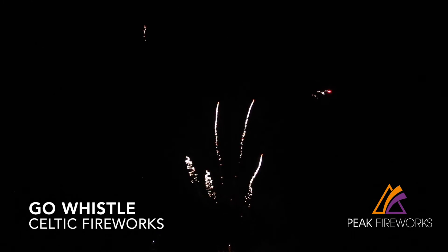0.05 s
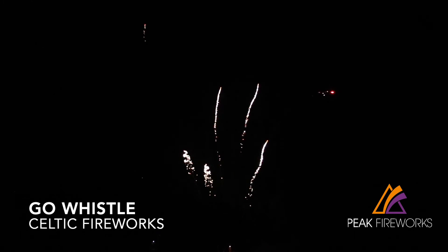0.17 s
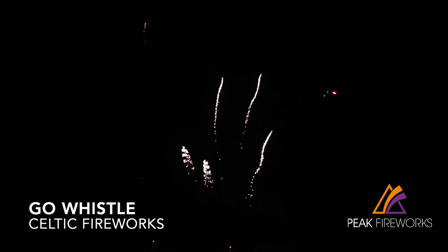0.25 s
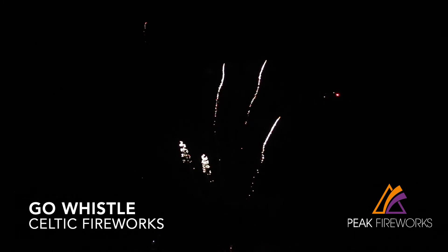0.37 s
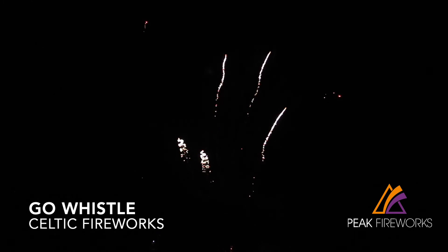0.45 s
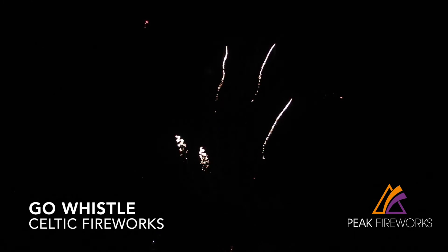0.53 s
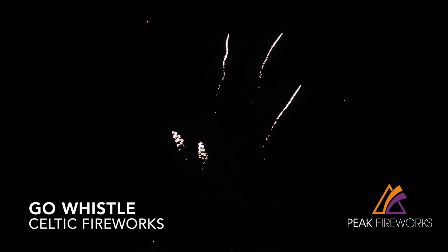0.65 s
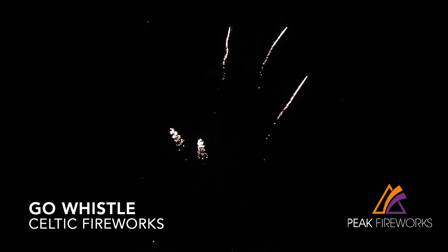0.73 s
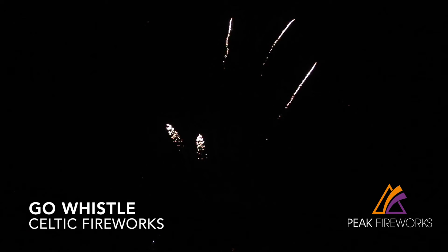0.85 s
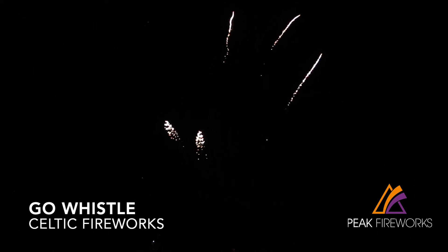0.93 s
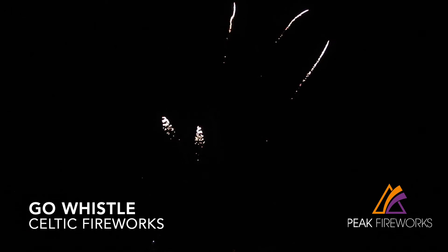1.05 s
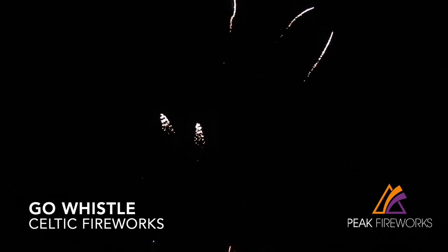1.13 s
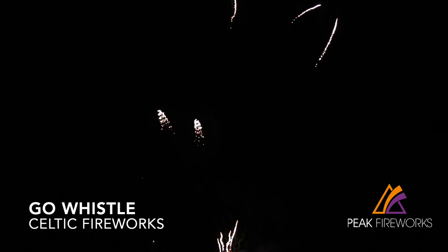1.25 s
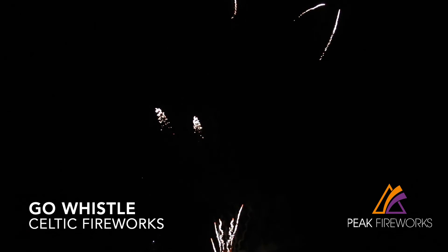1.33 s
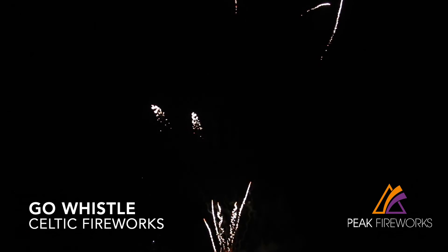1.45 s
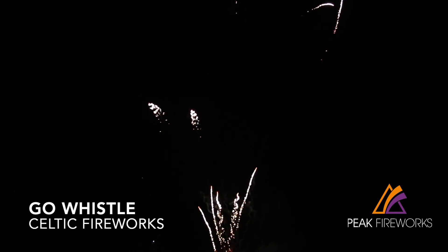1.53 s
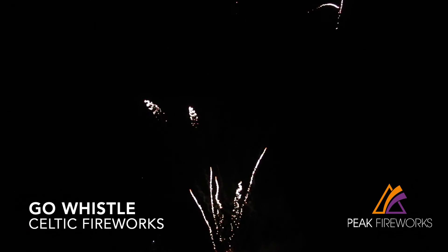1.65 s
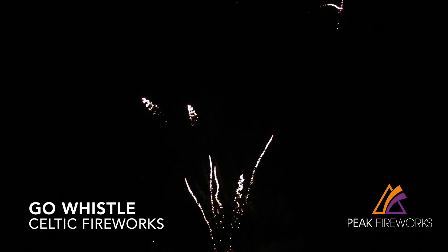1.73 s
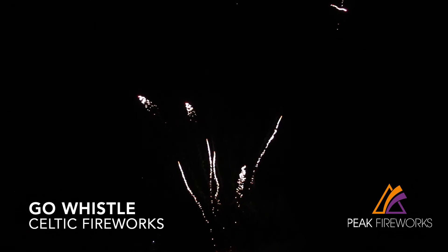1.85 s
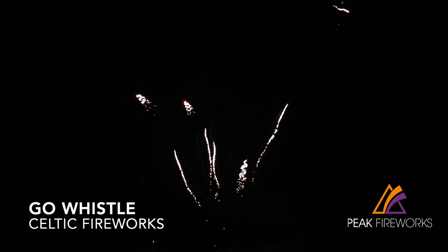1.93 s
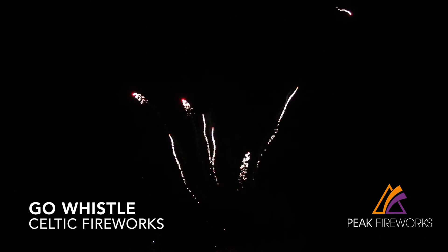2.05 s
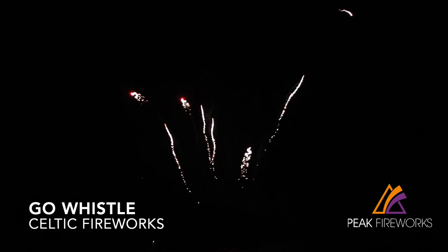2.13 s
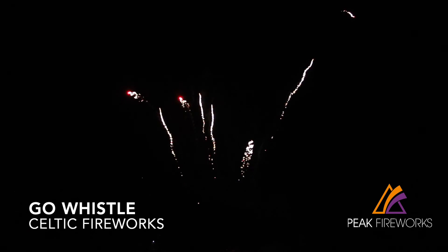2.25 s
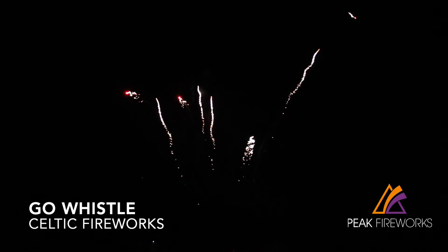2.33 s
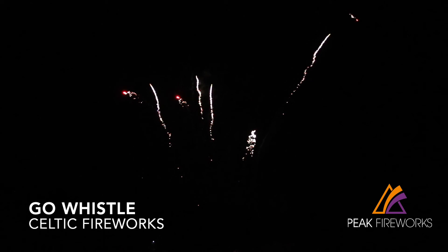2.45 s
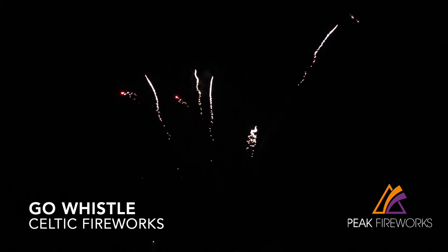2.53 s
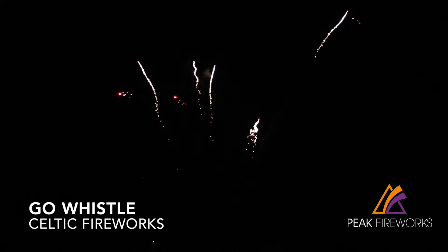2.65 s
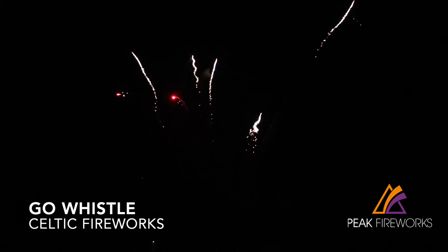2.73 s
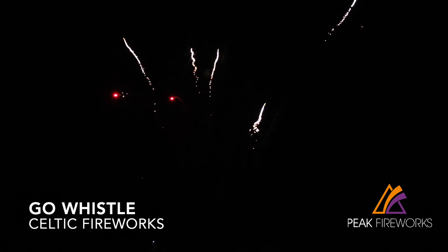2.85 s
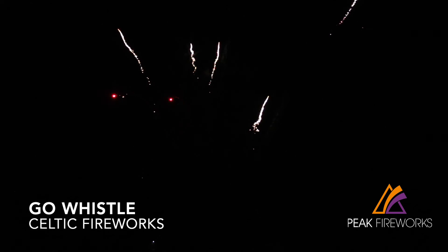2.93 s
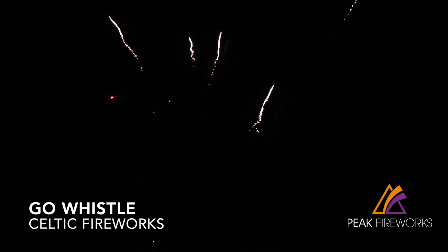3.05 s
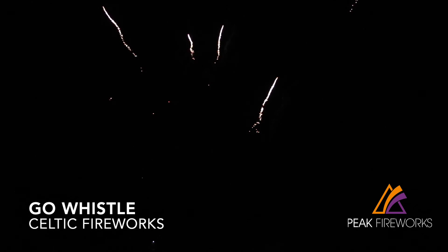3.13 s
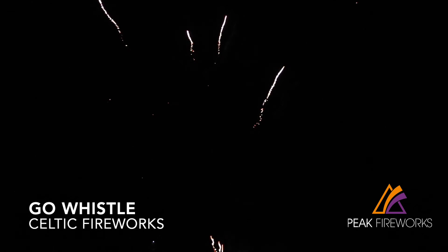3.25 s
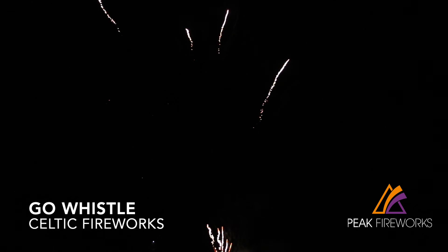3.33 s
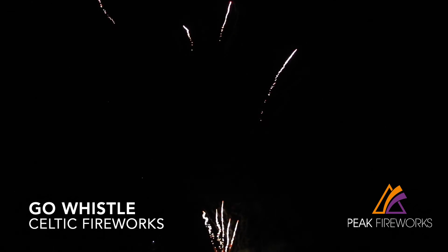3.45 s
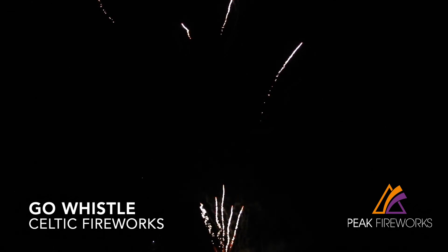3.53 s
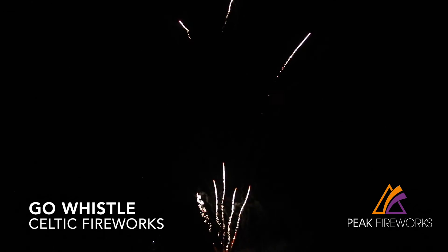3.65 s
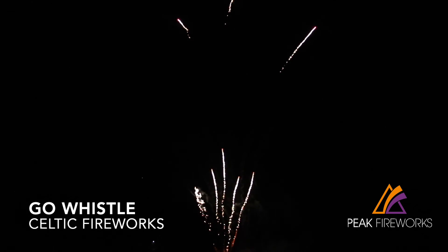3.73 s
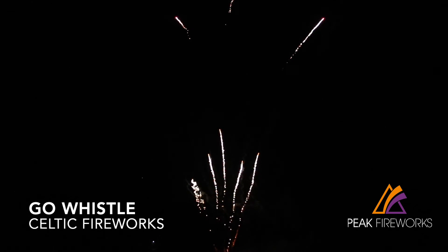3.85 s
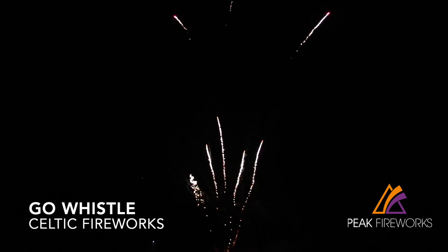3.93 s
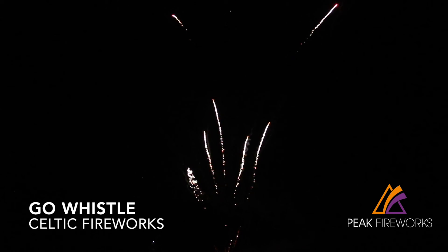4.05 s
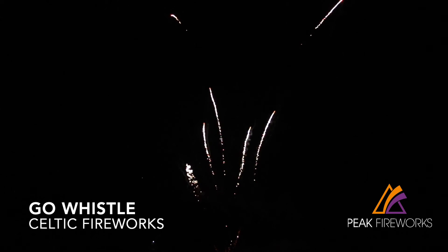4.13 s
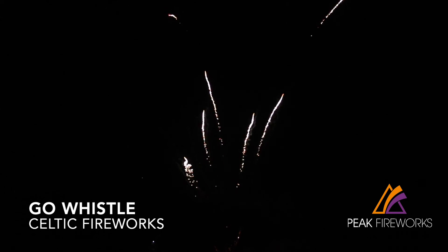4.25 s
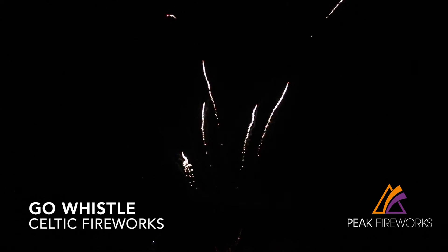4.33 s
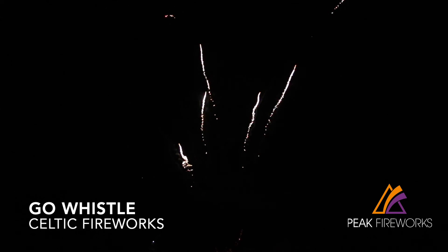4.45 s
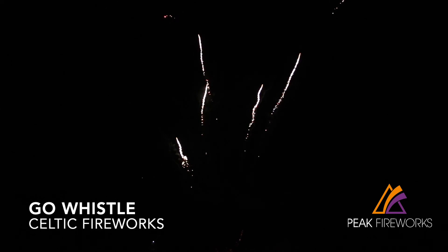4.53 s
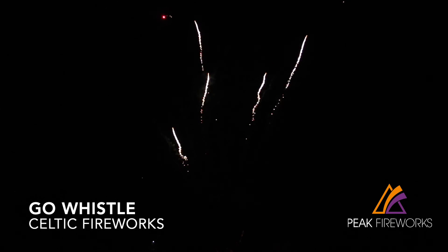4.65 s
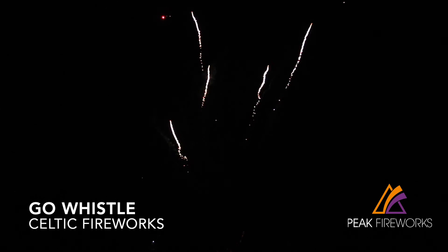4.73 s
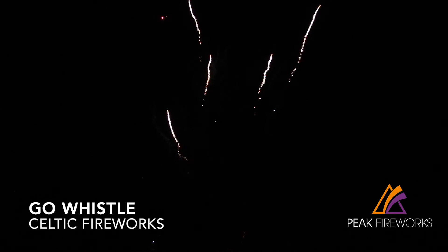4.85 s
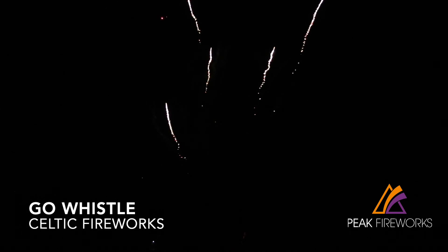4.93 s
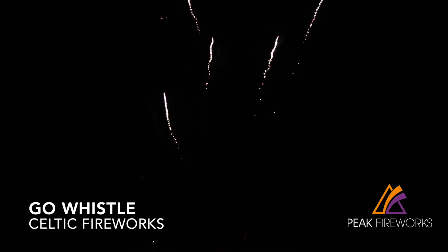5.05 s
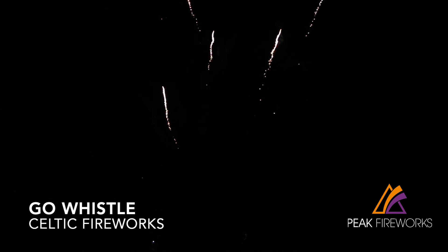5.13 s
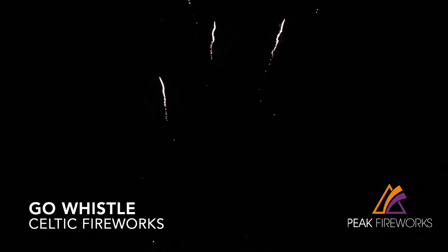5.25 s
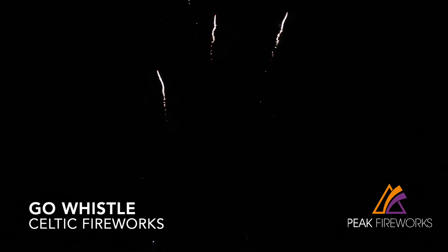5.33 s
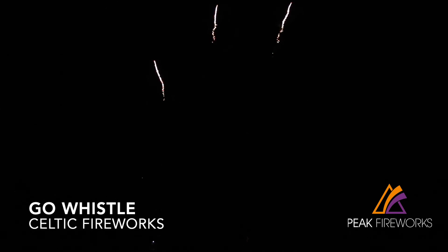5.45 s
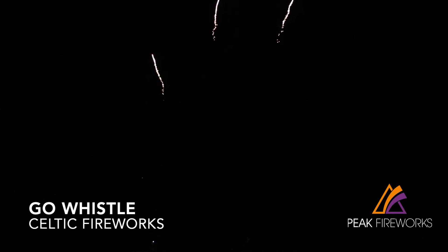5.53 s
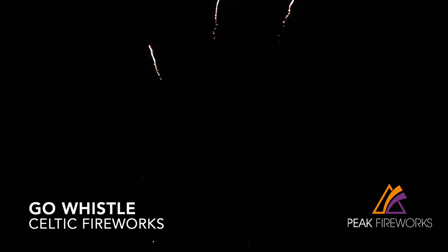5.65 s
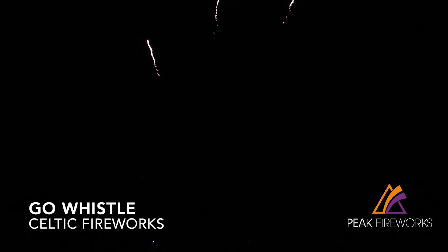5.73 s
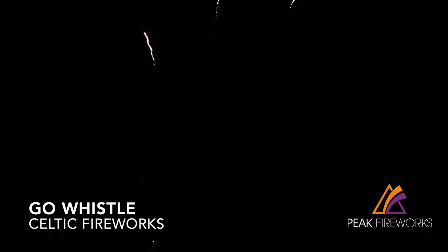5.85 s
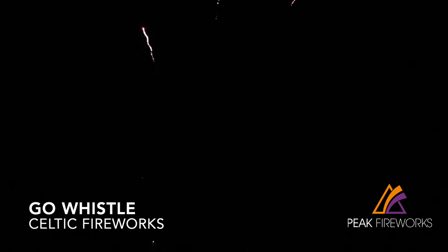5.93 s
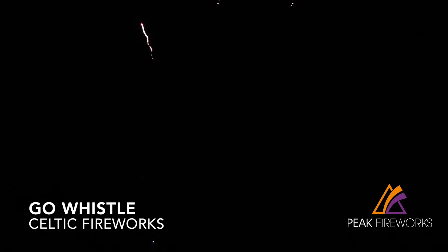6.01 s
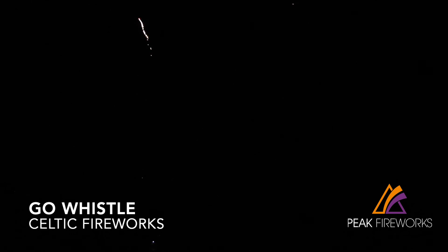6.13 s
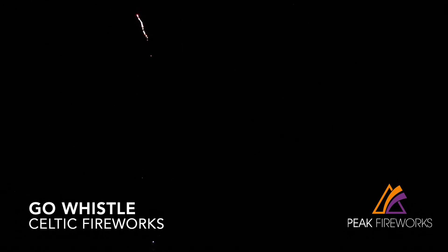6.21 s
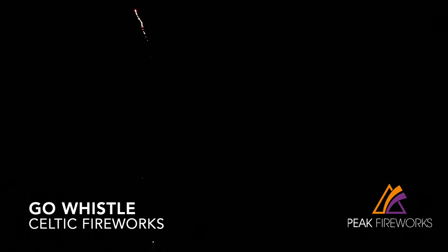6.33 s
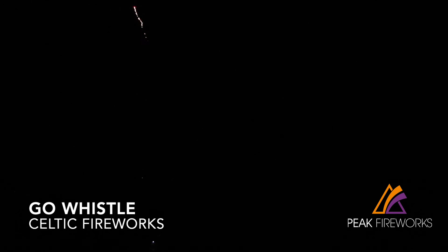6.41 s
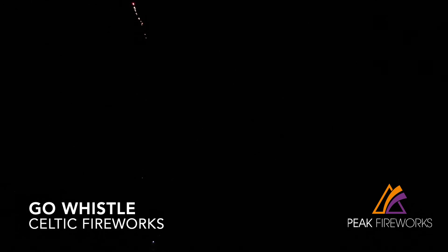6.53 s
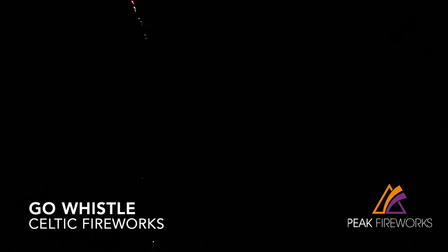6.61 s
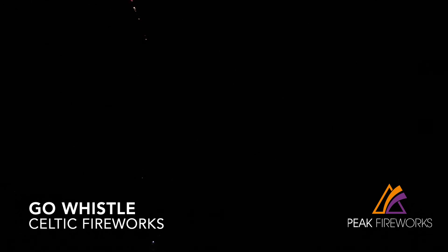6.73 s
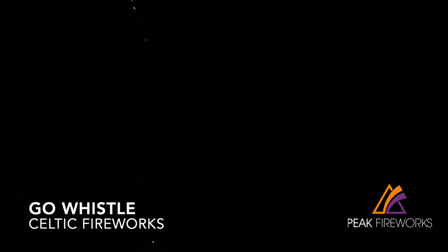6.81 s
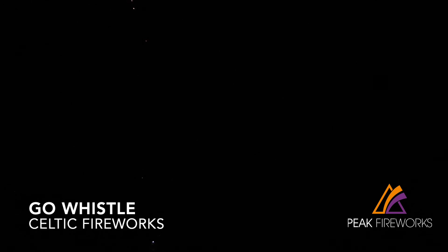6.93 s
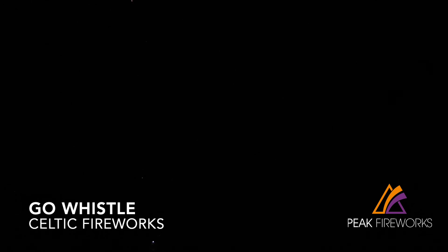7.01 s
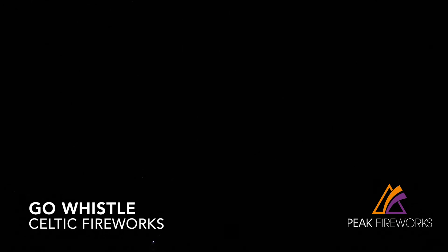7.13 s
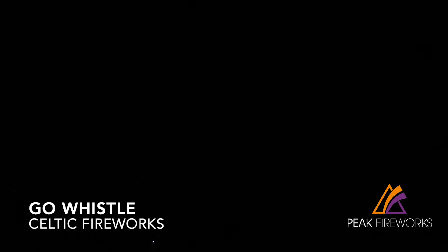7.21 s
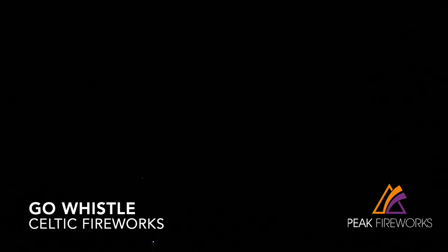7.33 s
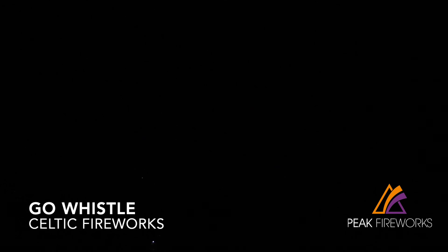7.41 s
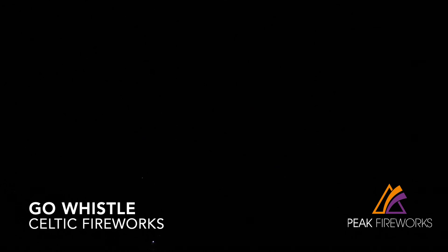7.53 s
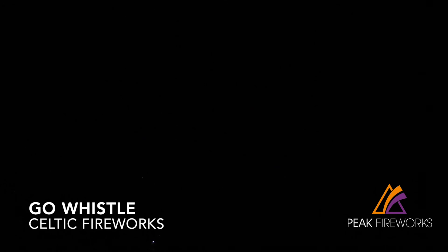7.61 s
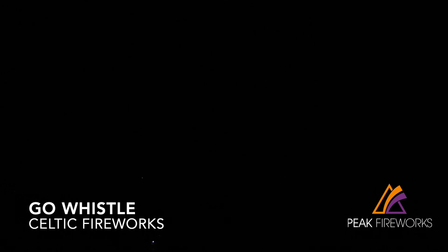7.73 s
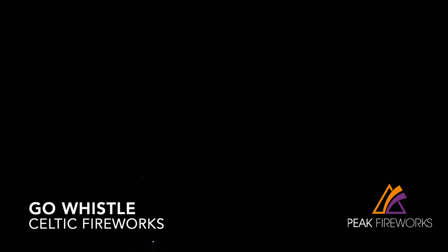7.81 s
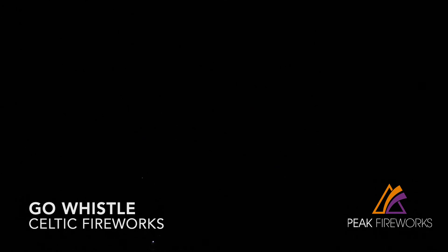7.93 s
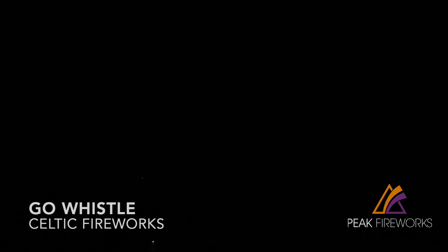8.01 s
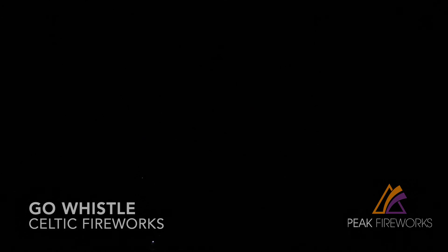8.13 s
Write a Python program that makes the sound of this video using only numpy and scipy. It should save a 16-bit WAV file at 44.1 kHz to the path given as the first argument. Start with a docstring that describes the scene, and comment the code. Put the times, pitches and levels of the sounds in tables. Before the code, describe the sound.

Outdoors at night, several whistling fireworks are already screaming, their close pitches sliding down and beating harshly. Five rapid pops launch another shrill volley at about one and a half seconds, and five more at three and a half. Whistles dip, lift slightly and burn out one by one by just under seven seconds, leaving a ringing wash, faint sputter and quiet night hush. Stereo, somewhat distant, with automatic gain.

```python
"""Whistling rockets, sixteen in three volleys: each is a harmonic tone whose pitch mostly slides down
and then lifts, so that neighbours beat. Six are alight at the start, and two volleys of five follow.
Rows of pops, five impulses each, launch the later two volleys by way of filtered pulses and tube modes.
Sharp cracks and noisy star sputter join in; garden, house and trees answer with echoes and a wash. Rolls,
rumble, a far whistle and night hush lie behind, and automatic gain recovers as the sound fades."""
import sys
import numpy as np
from scipy import signal
from scipy.fft import rfft, irfft, next_fast_len
from scipy.io import wavfile
from scipy.ndimage import uniform_filter1d

SR = 44100
rng = np.random.default_rng(int(sys.argv[2]) if len(sys.argv) > 2 else 0)


def transcribe(u):
    """Save the signal u as a 16-bit wav file named by the first command-line argument.

    u: samples, shape (n,) or (channels, n), limited to [-1, 1]; the rate is SR.
    q: integer samples, one column per channel.
    """
    v = np.clip(np.atleast_2d(u).T, -1, 1)
    q = np.round(v * 32767).astype(np.int16)
    wavfile.write(sys.argv[1], SR, q)


N = 360277
TIME = np.arange(N) / SR


def from_db(db):
    """Level definition: 20 dB is a tenfold amplitude."""
    return 10 ** (np.asarray(db) / 20)


def rms_one(x):
    """Power normalisation: scale to unit mean square."""
    return x / np.sqrt(np.mean(x ** 2) + 1e-20)


def at_hz(points, hz):
    """Logarithmic frequency scale: interpolate a spectrum along it."""
    f, value = np.transpose(points)
    return np.interp(np.log(hz + 1e-9), np.log(f), value)


def band(x, low_hz, high_hz, order=2):
    """Band limitation: causal Butterworth band-pass."""
    edges = [low_hz, min(high_hz, SR / 2 - 100)]
    return signal.sosfilt(signal.butter(order, edges, "band", fs=SR, output="sos"), x + 1e-18)


def panned(db):
    """Interaural level difference: gains for left and right."""
    return from_db(np.array([[db], [-db]]) / 2)


def lagged(x, lag_s):
    """Interaural time difference: delay the right channel."""
    return np.array([x[0], np.interp(TIME - lag_s, TIME, x[1])])


def drift(rate, t=TIME):
    """Random modulation: join Gaussian knots, `rate` of them a second, by straight lines."""
    knots = rng.standard_normal(N // 16)
    return np.interp(t * rate, np.arange(len(knots)), knots)


def swells(rows):
    """Gaussian envelopes: a bell-shaped rise for each (t/s, half length/s, level/dB)."""
    return sum(from_db(db) * np.exp(-.5 * ((TIME - s) / half) ** 2) for s, half, db in rows)


def clicks(rows):
    """Impulse excitation: one sample for each (t/s, level/dB)."""
    out = np.zeros(N)
    for s, db in rows:
        out[round(s * SR)] += from_db(db)
    return out


# coherence of left and right: (f/Hz, coherence/0-1)
COHERENCE = [(100, 0.99), (500, 0.99), (1000, 0.95), (2500, 0.44), (5000, 0)]


def noise(spectrum):
    """Spatial coherence: coloured stereo noise, alike in the bass and unrelated in the treble."""
    size = next_fast_len(N)
    hz = np.arange(size // 2 + 1) * SR / size
    mid, side = rfft(rng.standard_normal((2, size)))
    alike = np.clip(at_hz(COHERENCE, hz), -1, 1)
    pair = np.sqrt(1 + alike) * mid + np.sqrt(1 - alike) * side * [[1], [-1]]
    coloured = irfft(pair * from_db(at_hz(spectrum, hz)), size)
    return rms_one(coloured[:, :N])


def garden(x, scatter_db, t60, count=40):
    """Early reflections: ground, fences and walls add an echo cloud that differs at each ear."""
    out = []
    for ear in x:
        delay = rng.uniform(.002, .16, count)
        echoes = np.zeros(SR)
        echoes[(delay * SR).astype(int)] = rng.standard_normal(count) * from_db(-60 * delay / t60)
        echoes /= np.linalg.norm(echoes)
        out.append(ear + from_db(scatter_db) * signal.fftconvolve(ear, echoes)[:N])
    return np.array(out)


# decay of the surroundings: (f/Hz, t60/s)
FAR_T60 = [(200, 2.6), (2500, 6.2), (5000, 5.2), (8000, 2.4), (15000, .5)]


def surroundings(x, build_s):
    """Late reverberation: far houses and trees return a wash; air absorption shortens its treble."""
    t = np.arange(4 * SR) / SR
    edges_hz = [100, 1800, 4000, 6300, 9500, 15000]
    white = rng.standard_normal((2, len(t))) / np.sqrt(SR)
    tail = 0
    for low, high in zip(edges_hz, edges_hz[1:]):
        t60 = at_hz(FAR_T60, np.sqrt(low * high))
        tail = tail + band(white, low, high) * from_db(-60 * t / t60)
    build_up = 1 - np.exp(-t / build_s)
    return signal.fftconvolve(x.mean(axis=0)[None], tail * build_up, axes=1)[:, :N]


# harmonics of a whistle tube from the second up, before the flame alters them: level/dB
OVERTONES = [-20, -22.5, -37, -49, -62.5]


def whistle(t, hz, fierceness, lag_s, wander, tumble, rasp):
    """Air-column oscillation: harmonics of one unsteady pitch, brighter in a fiercer flame."""
    hz = hz * (1 + wander * drift(9, t) + tumble * drift(45, t) + rasp * drift(700, t))
    cycles = np.cumsum(hz) / SR
    phase = 2 * np.pi * np.array([cycles, cycles - hz * lag_s])  # left, right
    tone = np.sin(phase)
    for k, db in enumerate(OVERTONES, 2):
        audible = k * hz < SR / 2
        tone = tone + from_db(db) * fierceness ** ((k - 1) / 2) * np.sin(k * phase) * audible
    return tone


# colour of the night: (f/Hz, relative level per Hz/dB)
NIGHT = [(25, -30), (90, -7.5), (220, -2), (370, -4), (600, -9.5), (1200, -10), (2000, -12), (3600, -23),
         (6300, -32.5), (8500, -18.5), (10500, -32), (15000, -42)]


def night_hush():
    """Stationary ambient noise: a fixed colour whose level wavers slightly."""
    return from_db(-44.5) * noise(NIGHT) * from_db(1.0 * drift(8))


# low rumble far away: (t/s, half length/s, level/dB)
RUMBLE = [(.1, .15, -49), (1.8, 0.083, -41), (3.85, 0.11, -42), (7.4, 0.25, -54)]


def far_rumble():
    """Low-frequency narrow-band noise under Gaussian envelopes."""
    return swells(RUMBLE) * rms_one(band(rng.standard_normal(N), 70, 140))


# time just before each row of pops, from which its rolls are delayed
# (the first lies before the start, where no pops sound): t/s
ROLL_ORIGINS = [-0.47, 1.444, 3.474]
# far returns after each origin: (delay/s, half length/s, level/dB)
ROLLS = [(0.23, 0.12, -31.5), (0.816, 0.15, -40.5)]


def distant_rolls():
    """Delayed diffuse reflection: two swells of low noise follow each origin."""
    rows = [(s + delay, half, db) for s in ROLL_ORIGINS for delay, half, db in ROLLS]
    return swells(rows) * rms_one(band(rng.standard_normal(N), 195, 333))


# faint whistle rising far off: (t/s, f/Hz, relative level/dB)
FAR_WHISTLE = [(6.6, 2640, -37), (7.0, 2880, -42.5), (7.3, 3030, -44.5), (7.65, 3080, -59)]


def far_whistle():
    """Predominance of reflected sound: strong echoes blur the whistle and make it linger."""
    s, hz, db = np.transpose(FAR_WHISTLE)
    burning, out = (TIME > s[0]) & (TIME < s[-1]), np.zeros((2, N))
    t = TIME[burning]
    pitch = np.interp(t, s, hz)
    tone = whistle(t, pitch, fierceness=.1, lag_s=0, wander=.006, tumble=.016, rasp=.018)
    out[:, burning] = tone * from_db(np.interp(t, s, db))
    return garden(out, scatter_db=6.5, t60=0.98) + from_db(6) * surroundings(out, build_s=0.049)


def whistle_wash(whistles):
    """Spectrally selective reverberation: the lowest notes and those near 3300 Hz return weakest."""
    wash = from_db(-10.0) * surroundings(whistles, build_s=0.22)
    return signal.lfilter(*signal.iirnotch(3300, 5, fs=SR), band(wash, 2400, 12000, order=3))


def house_echo(whistles):
    """Discrete reflection: one far house returns a late, band-limited copy with its slide still clear."""
    late = np.interp(TIME - .76, TIME, whistles.mean(axis=0), left=0)  # delay in s
    dull = from_db(-21.5) * band(late, 2560, 3200)
    return garden([dull, dull], scatter_db=-2.5, t60=.3)


# sharp cracks, the first among the pops, the others from burning stars: (t/s, relative impulse level/dB)
CRACKS = [(1.516, -12), (4.462, -15), (4.957, -4), (7.685, -53)]
# sputter of dying stars: (t/s, half length/s, level/dB)
SPUTTER = [(6.84, 0.04, -49.5), (7.31, 0.033, -47.5), (7.83, 0.04, -53)]


def cracks_and_sputter():
    """Impulsive and random radiation: short band-passed cracks, and noise that flutters in level."""
    cracks = band(clicks(CRACKS), 1080, 2400, order=4) * from_db(25.0)
    sputter = band(rng.standard_normal((2, N)), 2480, 8200, order=2) * from_db(4.5 * drift(350))
    return garden([cracks], scatter_db=-14, t60=0.1) + rms_one(sputter) * swells(SPUTTER)


def ring(x, hz, t60):
    """Damped resonance: a unit click sets a decaying sine of height 1 ringing."""
    r, w = from_db(-60 / (t60 * SR)), 2 * np.pi * hz / SR
    return signal.lfilter([0, np.sin(w)], [1, -2 * r * np.cos(w), r * r], x + 1e-18)


# lift charges: (t/s, relative level/dB)
POPS = [(1.453, 1.5), (1.482, -1.5), (1.5116, -2), (1.5366, -0.5), (1.5701, -4), (3.497, -0.5),
        (3.535, -3.5), (3.5695, -0.5), (3.594, -6), (3.6193, -2)]
# ring of the tubes and their box: (f/Hz, relative level/dB, t60/s)
TUBE_MODES = [(173, -26.5, 0.047), (213, -16, 0.097), (238, -23, 0.042), (370, -12.5, 0.066),
              (413.5, -17.5, 0.11), (527.6, -17, 0.13), (825, -20.5, 0.06), (1045, -15, 0.1),
              (1291, -14, 0.047), (1561, -11.5, 0.049)]
# near reflections of a pop: (delay/s, gain)
POP_ECHOES = [(.0034, -0.53), (.0056, -0.3), (0.0092, -.25)]
# bands that the bounces off ground and fence cancel: (f/Hz, Q)
CANCELLED = [(120, 1.6), (690, 5.8)]
# puff of gas behind each charge: duration/s, level/dB
PUFF_S, PUFF_DB = .01, -1
# the sharp edge arrives off a nearby wall, just after the thump
CRACK_DELAY_S = 0.0035


def pops(blast_s, blast_db, ring_db, crack_db, thump_db):
    """Blast wave and modal response: a spike with a rebound rings the tubes, each time in a new mix."""
    fired = clicks(POPS)
    age = np.arange(SR // 50) / SR / blast_s
    direct = signal.fftconvolve(fired, (age - 1) * np.exp(-age))[:N]
    blast = direct + sum(gain * np.interp(TIME - delay, TIME, direct) for delay, gain in POP_ECHOES)
    tubes = 0
    for hz, db, t60 in TUBE_MODES:
        tubes = tubes + from_db(db) * ring(fired * from_db(1.83 * drift(40)), hz, t60)
    crack = band(clicks([(s + CRACK_DELAY_S, db) for s, db in POPS]), 1800, 6600, order=4)
    puff_shape = np.exp(-(np.arange(SR // 20) / SR / PUFF_S) ** 4)
    gas = signal.fftconvolve(fired, puff_shape)[:N] * rng.standard_normal(N)
    sound = from_db(blast_db) * band(blast, 320, 1900)
    sound = sound + from_db(ring_db) * band(tubes, 127, 3400)
    sound = sound + from_db(thump_db) * band(blast, 45, 230)
    sound = sound + from_db(crack_db) * crack
    sound = sound + from_db(PUFF_DB) * band(gas, 230, 1960, order=4)
    for hz, q in CANCELLED:
        sound = signal.lfilter(*signal.iirnotch(hz, q, fs=SR), sound)
    return lagged(garden([sound], scatter_db=-10, t60=0.22, count=120) * panned(2.6), lag_s=.00007)


# a rocket further left is both louder and earlier on the left
LAG_S_PER_DB = .00002
# the rockets leave from one spot and fan out late in their flight
LAUNCH_PAN_DB, FAN_POWER = 5, 1.56
# a whistle swells as it catches and stops short at burn-out
CATCH_S, SNUFF_S = 0.0073, 0.0024
# corkscrew flight swings the pitch: mean turns per s, share of the pitch
SPIN_PER_S, SPIN_SWING = 11, .005
# hard tumbling at launch dies away: extra share of the tumble, time constant/s
LAUNCH_TUMBLE, STEADY_S = 1.3, 0.201
# the fuel burns ever more fiercely up to the turn: overtones and hiss grow, then fall away
OVERTONES_AT_TURN_DB, OVERTONES_GROW_DB_PER_S, OVERTONES_FALL_DB_PER_S = 2.5, 3.5, 6
HISS_AT_TURN_DB, HISS_GROW_DB_PER_S, HISS_FALL_DB_PER_S = -29, 2.5, 29
# colour of the jets: (f/Hz, relative level per Hz/dB)
JET = [(300, -21.5), (700, -12.5), (1100, -6.5), (2000, -1), (2800, 5), (3500, -8.5), (4300, -7),
       (6300, -11.5), (8500, -12.5), (11000, -24.5), (15000, -60)]
# flights; pitch falls with gathering speed and a longer air column, and rises after tipping over:
# (left-right difference at burn-out/dB, [(t/s, f/Hz, relative level/dB), ..] from catching to burn-out)
ROCKETS = [ (5, [(-.2, 2450, -10), (.1, 2506, -10.5), (.5, 2560, -18)]), (1, [(-.2, 3060, 6),
           (.3, 2826, -26), (.52, 2700, -10.5), (.72, 2762, -4), (.97, 2684, -2.5), (1.14, 2556, -9.5),
           (1.35, 2473, -9.5), (1.65, 2384, -6), (2.25, 2730, -8.5)]), (0.5, [(-.2, 2992, 4),
           (.4, 2702, 1.5), (.8, 2645, -2), (1.2, 2506, 1), (1.5, 2418, -3), (1.68, 2352, -3.5),
           (1.9, 2497, -8), (2.3, 2626, -9)]), (-1, [(-.2, 2960, 15), (.2, 2772, 7.5), (.6, 2665, 4),
           (1, 2529, -2.5), (1.3, 2424, -10), (1.65, 2325, -2), (1.9, 2443, -9.5), (2.25, 2590, -12)]),
           (3.5, [(-.2, 2920, -5.5), (.3, 2760, -15), (.72, 2539, 3.5), (1, 2463, -3.5), (1.3, 2337, -4),
           (1.6, 2290, -4.5), (1.92, 2195, -12), (2.22, 2372, -15), (2.5, 2445, -20)]),
           (4.5, [(-.2, 3078, 0.5), (.35, 2790, -0.5), (.7, 2639, -1), (1.1, 2478, -6), (1.45, 2377, -9),
           (1.75, 2300, -13), (2.12, 2445, -15)]), (4.5, [(1.505, 3676, -1.5), (1.55, 3470, -4.5),
           (1.66, 3230, -10), (1.8, 3153, -1), (2, 2976, -15), (2.3, 2787, -2.5), (2.9, 2596, -1),
           (3.7, 2393, 0), (4.3, 2660, -10)]), (2, [(1.55, 3540, -13), (1.59, 3260, -4), (1.72, 2960, 3),
           (1.87, 2900, 1.5), (2.35, 2695, 0), (3.13, 2347, 0.5), (3.52, 2289, 4.5), (3.86, 2205, -8.5),
           (4.25, 2480, -9.5)]), (3.5, [(1.59, 3510, -3), (1.66, 3470, -14.5), (1.74, 3190, -4),
           (1.95, 2973, -1.5), (2.5, 2709, -8), (2.95, 2521, 1), (3.35, 2513, -1), (3.72, 2409, 3.5),
           (4.12, 2615, -9)]), (-1.5, [(1.6, 3330, -11), (1.72, 3114, 6.5), (1.9, 3020, -4),
           (2.05, 2852, -8), (2.6, 2611, -7.5), (3.1, 2436, -9), (3.6, 2401, 5), (3.85, 2305, -9.5),
           (4.2, 2520, -14)]), (-0.5, [(1.62, 3373, -6.5), (1.78, 3004, -5), (2.1, 2881, 3.5),
           (2.55, 2671, -7), (2.85, 2526, 7.5), (3.3, 2378, -1), (3.62, 2252, -5), (3.74, 2254, -20)]),
           (-7, [(3.565, 3700, -1), (3.6, 3408, 1.5), (3.64, 3440, -7.5), (3.68, 3123, 8), (3.9, 2882, 0),
           (4.08, 2827, 1.5), (4.4, 2630, 5.5), (5.1, 2423, -5), (5.55, 2335, -6), (5.86, 2250, -1),
           (6.12, 2335, -6), (6.35, 2483, -6.5), (6.79, 2597, -3)]), (7, [(3.625, 3620, -8),
           (3.68, 3400, 1), (3.75, 3140, 0), (3.82, 3064, -0.5), (4.2, 2850, 5), (4.6, 2626, 1.5),
           (5.05, 2513, -2.5), (5.65, 2308, -5), (5.98, 2342, 0), (6.25, 2480, -1), (6.55, 2600, -4.5)]),
           (3.5, [(3.73, 3590, 0), (3.78, 3460, -8), (3.82, 3200, -6), (4, 3029, -0.5), (4.33, 2980, -4),
           (4.6, 2761, -1.5), (4.87, 2780, -2.5), (5.08, 2683, -4), (5.28, 2714, -3.5), (5.45, 2595, -4),
           (5.64, 2615, -0.5), (5.88, 2400, -2), (6.16, 2600, -9), (6.53, 2675, -8.5)]),
           (2, [(3.635, 3350, -17), (3.67, 2990, -12), (3.72, 2950, 1.5), (3.76, 3047, 3),
           (4.1, 2880, -15.5), (4.7, 2638, -4.5), (5.25, 2508, 4), (5.6, 2387, -6), (5.93, 2369, -6),
           (6.17, 2384, -1)]), (-3.5, [(3.76, 3218, -2), (3.92, 3194, -6.5), (4.15, 2903, -5.5),
           (4.42, 2845, -8), (4.8, 2620, 0), (5.2, 2424, -7), (5.5, 2425, -3), (5.9, 2275, -3)])]
# loudness curve for the evened chorus: (t/s, level/dB)
LOUDNESS = [(0.01, -2), (0.14, -4), (0.22, -7), (0.28, -5.5), (0.39, -5), (0.44, -11), (0.49, -4.5),
            (0.535, -9), (0.565, -1), (0.66, -3.5), (0.84, -4), (0.97, -3), (1.09, -3), (1.23, -1),
            (1.3, -4.5), (1.49, -3), (1.76, 3), (1.87, -0.5), (2.18, -5), (2.24, -1.5), (2.28, -5.5),
            (2.39, -5), (2.49, -3.5), (2.68, -4), (2.77, -8), (2.94, -5.5), (3.11, -4.5), (3.16, -7.5),
            (3.21, -2.5), (3.43, -4), (3.51, 0), (3.56, -3.5), (3.88, 1), (4.0, -1.5), (4.08, 1.5),
            (4.13, -4), (4.2, -1), (4.42, -3), (4.62, -8), (4.76, -4), (5.07, -2), (5.31, -5), (5.42, -3.5),
            (5.5, -7), (5.58, -3.5), (5.99, -6.5), (6.05, -10), (6.09, -6), (6.2, -10), (6.32, -7),
            (6.51, -14.5), (6.57, -19.5), (6.66, -15), (6.74, -19.5), (6.8, -31)]


def rockets():
    """Beating and jet noise: neighbouring pitch slides interfere, and every jet adds its hiss."""
    chorus, jet_power = np.zeros((2, N)), np.zeros(N)
    for pan_db, flight in ROCKETS:
        s, hz, db = np.transpose(flight)
        lit, turn, out = s[0], s[np.argmin(hz)], s[-1]  # the turn is the lowest pitch
        burning = (TIME > lit) & (TIME < out)
        t = TIME[burning]
        before_turn, after_turn = np.maximum(turn - t, 0), np.maximum(t - turn, 0)
        catching = (1 - np.exp((lit - t) / CATCH_S)) * np.clip((t - t[0]) / SNUFF_S, 0, 1)
        alight = catching * np.clip((out - t) / SNUFF_S, 0, 1)
        flown = (t - lit) / (out - lit)
        side_db = LAUNCH_PAN_DB + (pan_db - LAUNCH_PAN_DB) * flown ** FAN_POWER
        fierceness = from_db(OVERTONES_AT_TURN_DB - OVERTONES_GROW_DB_PER_S * before_turn
                             - OVERTONES_FALL_DB_PER_S * after_turn)
        hiss_gain = from_db(HISS_AT_TURN_DB - HISS_GROW_DB_PER_S * before_turn
                            - HISS_FALL_DB_PER_S * after_turn)
        unsteady = 1 + LAUNCH_TUMBLE * np.exp((lit - t) / STEADY_S)
        spin = 1 + SPIN_SWING * np.sin(2 * np.pi * (SPIN_PER_S * t + drift(2, t)))
        tone = whistle(t, np.interp(t, s, hz) * spin, fierceness, LAG_S_PER_DB * side_db,
                       wander=.003, tumble=.005 * unsteady, rasp=.006 * unsteady)
        # the nozzle swings towards and away from the listener, and the flame sputters
        gain = alight * from_db(np.interp(t, s, db) + drift(9, t) + 2.7 * drift(60, t))
        chorus[:, burning] += tone * gain * from_db(np.array([side_db, -side_db]) / 2)
        jet_power[burning] += (alight * hiss_gain) ** 2
    chorus = garden(chorus, scatter_db=-1.0, t60=0.18)
    # the chorus is evened out and then follows its loudness curve
    power = uniform_filter1d(np.mean(chorus ** 2, axis=0), int(0.058 * SR))
    level = from_db(np.interp(TIME, *np.transpose(LOUDNESS)))
    hiss = np.sqrt(jet_power) * noise(JET) * from_db(1.43 * drift(30)) * panned(1.7)
    return level * chorus / np.sqrt(np.abs(power) + 0.026) + hiss


def scene():
    """Superposition: whistles, pops, cracks and sputter add to the echoes and the night."""
    whistles = rockets()
    launch = pops(blast_s=0.0014, blast_db=6.5, ring_db=6.0, crack_db=15, thump_db=-1)
    returned = whistle_wash(whistles) + house_echo(whistles) + distant_rolls()
    background = returned + far_rumble() + night_hush() + far_whistle()
    return whistles + launch + cracks_and_sputter() + background * panned(2.0)


def gain_control(x, threshold_db, release_db_per_s, window_s):
    """Dynamic compression: loud sound turns the gain down; it creeps back as the level falls."""
    power = uniform_filter1d(np.mean(x ** 2, axis=0), int(window_s * SR))
    level_db = 10 * np.log10(np.abs(power) + 1e-12)
    release_db = release_db_per_s * TIME
    held_db = np.maximum.accumulate(level_db + release_db) - release_db
    return x * from_db(-np.maximum(held_db - threshold_db, 0))


def record(dry):
    """Limited dynamics and bandwidth: automatic gain, then a steep low-pass at 15.6 kHz."""
    levelled = gain_control(dry, threshold_db=-17.0, release_db_per_s=10.5, window_s=0.5)
    return signal.sosfilt(signal.ellip(10, .3, 70, 15600, fs=SR, output="sos"), levelled)


dry = scene()
out = record(dry)
transcribe(out)
```